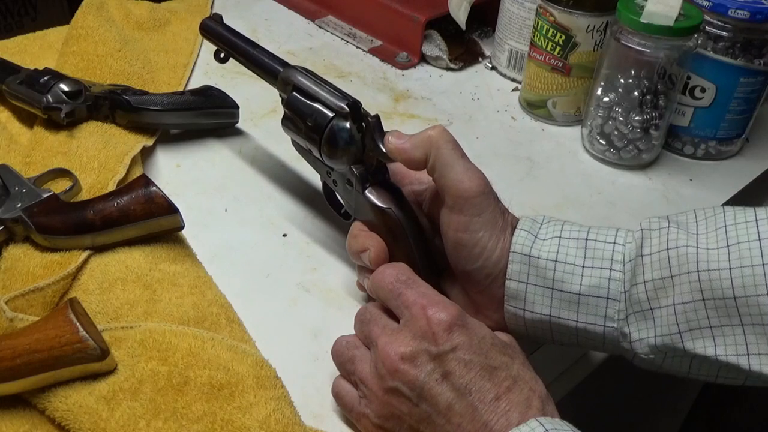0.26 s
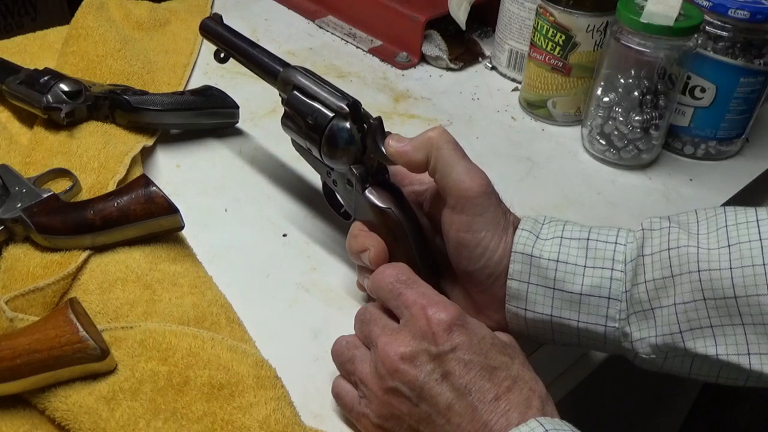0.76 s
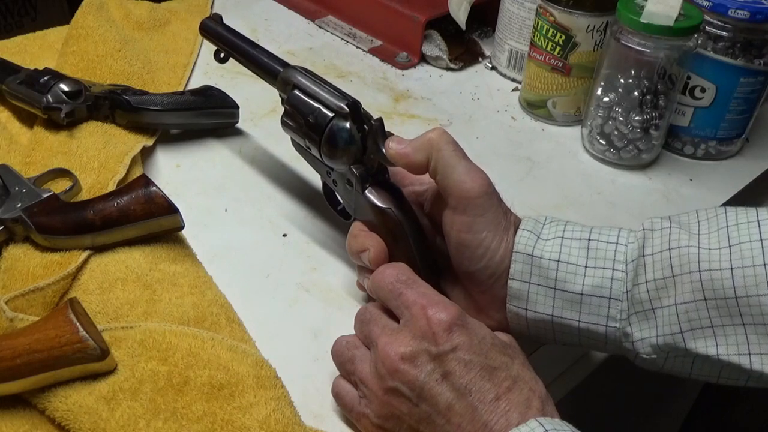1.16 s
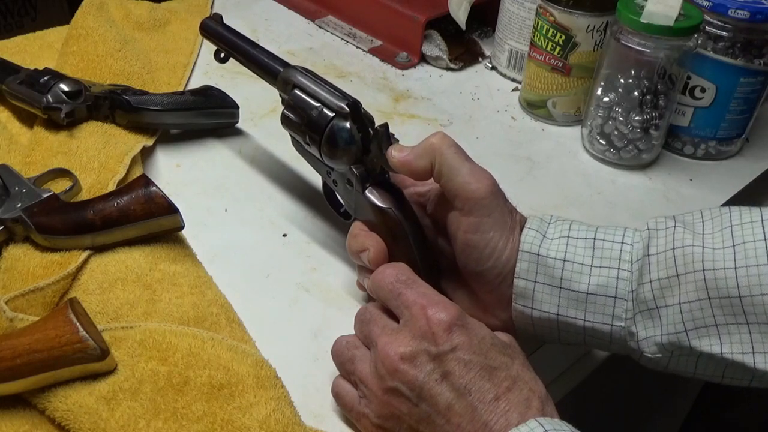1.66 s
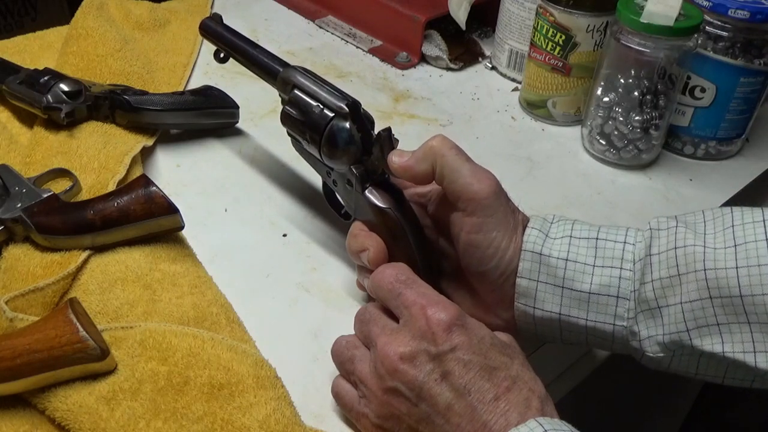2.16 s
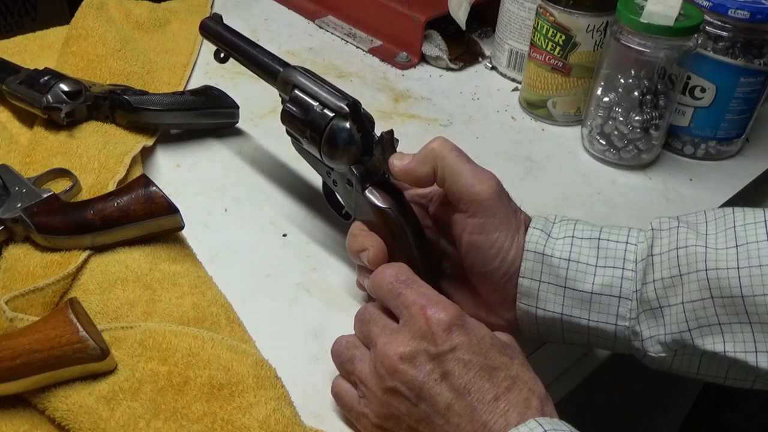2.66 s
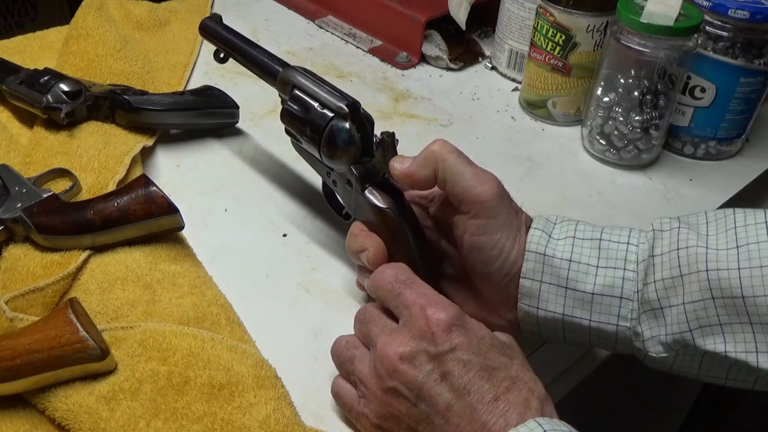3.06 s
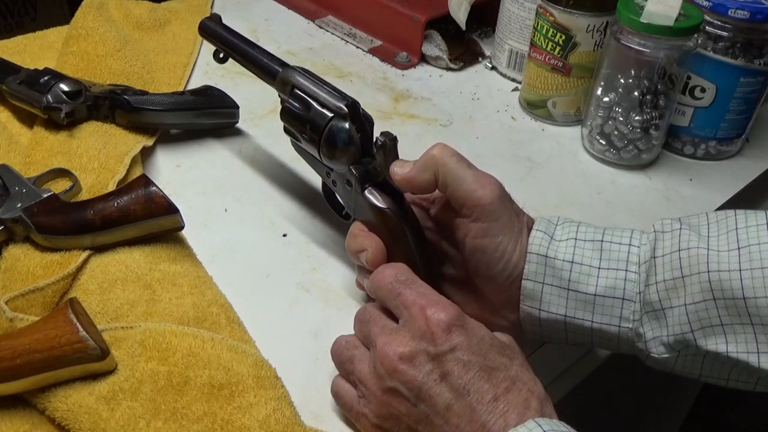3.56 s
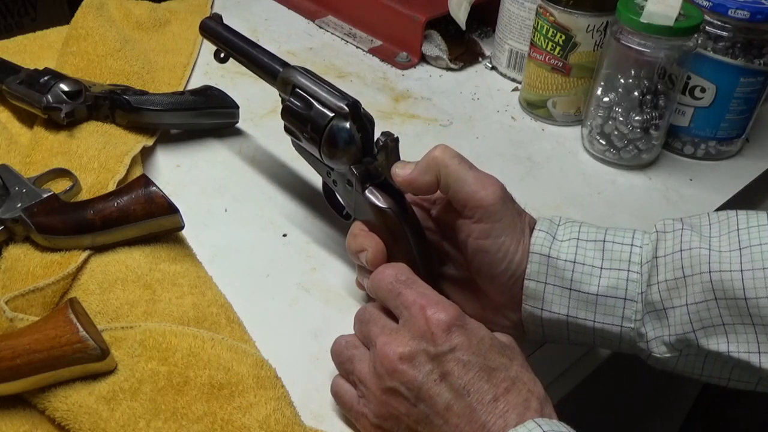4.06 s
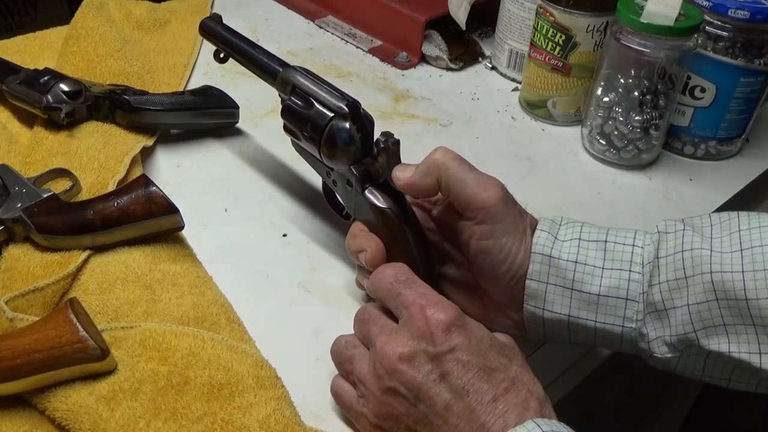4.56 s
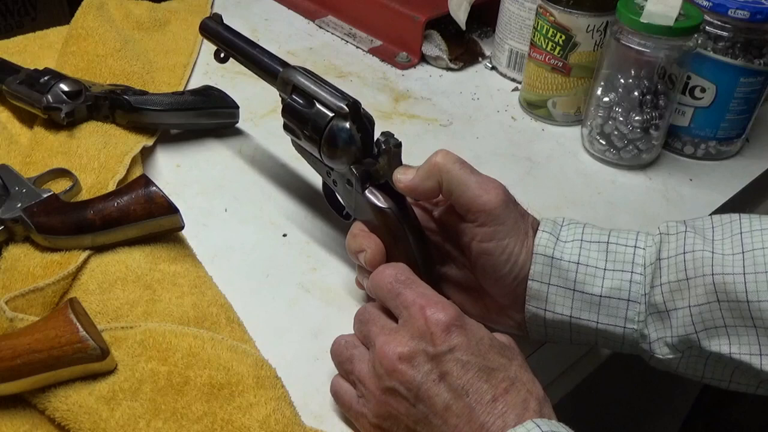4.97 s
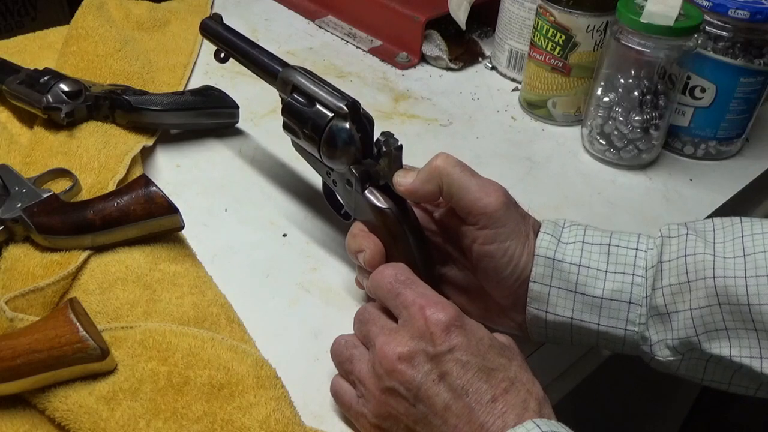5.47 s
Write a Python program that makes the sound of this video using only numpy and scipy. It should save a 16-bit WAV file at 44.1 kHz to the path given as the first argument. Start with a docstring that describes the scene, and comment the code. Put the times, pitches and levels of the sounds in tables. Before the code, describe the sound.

A revolver is handled close to the microphone in a small, quiet workshop, with faint, steady room air and hiss throughout. At about 0.3 seconds the thumb bumps the gun softly, with a fainter touch at 0.6. At 0.8 seconds the hammer drops into its first catch with a sharp metallic click that has a little hollow body from the frame. Between 2 and 3.1 seconds come a few very faint, dull bumps of the hand. At about 3.5 seconds the second catch gives the brightest, strongest click, with a tiny steel ring. After a pause of only room hiss, a third, slightly softer and thinner click sounds at about 5.4 seconds. Each click dies away almost at once, followed by a very short echo from the room.

```python
"""In a small, quiet workshop, a revolver hammer is thumbed slowly back over a bench.
The lockwork drops into three catches; each impact excites the normal modes of the steel and of the
hand-held frame for a few milliseconds. Before and between the catches the thumb bumps the gun softly.
The room answers with early echoes, a short diffuse tail and standing waves, over steady air and hiss."""
import sys
import numpy as np
from scipy import signal
from scipy.fft import rfft, irfft
from scipy.io import wavfile

SR = 44100
rng = np.random.default_rng(int(sys.argv[2]) if len(sys.argv) > 2 else 0)


def unload_wav(signal):
    """Save mono or channel-first audio to the path in sys.argv[1] as 16-bit WAV at rate SR, clipped to [-1, 1]."""
    wavfile.write(
        sys.argv[1],
        SR,
        np.round(np.clip(np.atleast_2d(signal).T, -1, 1) * 32767).astype(np.int16),
    )


N = 252296
RING_S = np.arange(SR // 2) / SR  # time axis of one impulse response
LEFT_RIGHT = np.array([[1], [-1]])  # sign of the side signal in each channel
# normal modes of the hand-held frame: (frequency [Hz], time to peak [s], level [dB])
FRAME_MODES = [(143.9, .0037, -38.8), (239.7, .0019, -30), (380.9, .0022, -17.5), (552, .0033, -29.5),
               (782, .0019, -35), (1075, .003, -38), (1223, .0029, -20), (1640, .0022, -33),
               (1920, .0016, -25)]


def undb(db):
    """Amplitude ratio of a level in decibels."""
    return 10 ** (np.asarray(db) / 20)


def along(hz, points, values):
    """Linear interpolation on a logarithmic frequency axis."""
    return np.interp(np.log(np.maximum(hz, 1)), np.log(points), values)


def colour(x, spectrum):
    """Spectral shaping by a table of (frequency [Hz], gain [dB])."""
    hz = np.fft.rfftfreq(x.shape[-1], 1 / SR)
    return irfft(rfft(x) * undb(along(hz, *np.transpose(spectrum))), x.shape[-1])


def roll_off(x, cutoff_hz, kind="low", order=1):
    """Butterworth filtering: 6 dB per octave for each order beyond the cut-off."""
    return signal.sosfilt(signal.butter(order, cutoff_hz, kind, fs=SR, output="sos"), x)


def add(track, time_s, sound):
    """Superposition: a sound joins the track at its onset time."""
    start = int(time_s * SR)
    part = sound[:N - start]
    track[start:start + len(part)] += part


def air(mid_rms_db=-59.72):
    """Stationary noise of room air and microphone hiss; the bass is nearly coherent in both channels."""
    # spectrum of air and hiss: (frequency [Hz], relative spectral density [dB])
    noise_spectrum = [(10, -15.5), (25, -7.5), (60, -4.5), (135, -1.5), (250, -2.5), (450, -6), (850, -8.5),
                      (1100, -7), (1220, -6), (1400, -10.5), (2000, -12), (4000, -15.5), (8500, -18.5),
                      (9600, -17), (11000, -22.5)]
    # stereo width: (frequency [Hz], side minus mid level [dB])
    side_spectrum = [(60, -11.5), (110, -12), (200, -7), (380, -2), (700, 1), (1290, -1), (2380, -1),
                     (4400, -4.5), (8120, -8), (15000, -7)]
    mid, side = (colour(rng.standard_normal(N), noise_spectrum) for _ in range(2))
    side = colour(side, side_spectrum)
    return (mid + LEFT_RIGHT * side) * undb(mid_rms_db) / mid.std()


def swell(peak_s, lag_s):
    """Transient envelope: vibration builds while the parts chatter and is damped as they seat."""
    age = np.maximum(RING_S - lag_s, 0) / peak_s
    return np.sqrt(age) * np.exp((1 - age ** 2) / 4)


def ring(modes, place, tilt_db, contact=np.ones_like, lag_cycles=0.54, node_db=-17):
    """Modal superposition: mode n spans n half-waves and is driven as much as it swings where struck."""
    middle_octave = np.log2(np.array(modes)[:, 0]).mean()
    sound = 0
    for n, (hz, peak_s, db) in enumerate(modes, 1):
        swing = np.hypot(np.sin(np.pi * n * place), undb(node_db))  # even a node takes a little
        force = undb(tilt_db * (np.log2(hz) - middle_octave)) * contact(hz)
        # neighbouring modes swing in opposite senses, and the low ones start last
        wave = (-1) ** (n - 1) * swell(peak_s, lag_cycles / hz) * np.sin(2 * np.pi * hz * RING_S)
        sound = sound + undb(db) * swing * force * wave
    return sound


def thumb(place=.345, tilt_db=-5.9):
    """Compliant contact: flesh pushes slowly, so frame modes above the cut-off are barely excited."""
    # bumps of thumb and hand: (time [s], level [dB], contact cut-off [Hz])
    bumps = [(0.3452, -21.2, 2400), (0.628, -29.7, 520), (2.044, -20.5, 115), (2.523, -30, 263),
             (2.71, -27.5, 169), (3.097, -32.5, 220)]
    track = np.zeros(N)
    for time_s, db, cutoff_hz in bumps:
        flesh = lambda hz: 1 / np.hypot(1, np.square(hz / cutoff_hz))
        add(track, time_s, undb(db) * ring(FRAME_MODES, place, tilt_db, flesh))
    return track


def diffuse_tail():
    """Reverberation: overlapping bands of noise decay exponentially, each at its own rate."""
    # scattered reflections: (frequency [Hz], level against the direct sound [dB], 60 dB decay time [s])
    reverb_bands = [(100.7, -17, .3), (349.5, -7.5, .3), (700, 6.5, .19), (1200, -11, 0.15),
                    (1679, 0, 0.155), (2490, -12.5, 0.1776), (3300, -11, .18), (4500, -10, 0.16),
                    (5856, -19, .17), (7760, -8, .16), (9805, -14, 0.19), (11000, -21.5, 0.17)]
    centres_hz, levels_db, t60s = np.transpose(reverb_bands)
    hz = np.fft.rfftfreq(len(RING_S), 1 / SR)
    noise = rfft(rng.standard_normal(len(RING_S)))
    tail = 0
    for band, db, t60 in zip(np.eye(len(centres_hz)), levels_db, t60s):
        band_noise = irfft(noise * along(hz, centres_hz, band), len(RING_S))
        fade = np.exp(-np.log(1000) * RING_S / t60)
        tail = tail + undb(db) * band_noise * fade / np.linalg.norm(fade)
    return tail


def workshop(sound, build_s=0.0013, side_db=-6, side_low_hz=550):
    """Convolution with a room impulse response: diffuse tail, early echoes and standing waves."""
    # nearest surfaces: (delay [s], gain [dB], left minus right level [dB], treble cut-off [Hz])
    echoes = [(.0021, -14.5, 6.5, 6000), (0.0137, -23, -6, 3980), (0.02, -14, 1, 900)]
    # standing waves: (frequency [Hz], 60 dB decay time [s], gain at resonance [dB])
    room_modes = [(138.2, .3, -2.5), (221.6, .28, 4), (252.2, 0.29, 8.5), (299.6, 0.32, 5), (352, 0.22, 7),
                  (442, 0.13, -11), (415, 0.06, -3), (571.5, 0.2246, 6), (616, 0.33, 3), (735, 0.15, 5),
                  (820, .18, 7.5)]
    side = roll_off(diffuse_tail(), side_low_hz, "high")  # long waves reach both sides alike
    build = 1 - np.exp(-RING_S / build_s)
    response = (diffuse_tail() + undb(side_db) * LEFT_RIGHT * side) * build
    for delay_s, db, pan_db, cutoff_hz in echoes:
        echo = signal.unit_impulse(len(RING_S), int(delay_s * SR))
        response += undb(db + LEFT_RIGHT * pan_db / 2) * roll_off(echo, cutoff_hz)
    for hz, t60, db in room_modes:
        fade = np.exp(-np.log(1000) * RING_S / t60) * build
        response += undb(db) * 2 * fade / fade.sum() * np.cos(2 * np.pi * hz * RING_S)
    return signal.fftconvolve(sound[None], response, axes=1)[:, :N]


def radiate(x, low_hz):
    """Radiation efficiency: small parts shed long waves poorly, a steep high-pass."""
    return roll_off(x, low_hz, "high", order=4)


def lockwork(tooth_width_hz=85, crack_s=0.0011, crack_low_hz=3000, ring_low_hz=105):
    """Impact excitation: each catch gives modal ringing, contact cracks and a snap sent to the walls."""
    # the three catches; place is the struck point along a part, tilt the brightness of the blow:
    # (time [s], frame place [0-1], frame level [dB], frame tilt [dB/octave],
    #  steel place [0-1], steel level [dB], steel tilt [dB/octave], tooth resonance [Hz], tooth lift [dB],
    #  crack level [dB], rebound delay [s], rebound gain [dB], snap level [dB], snap low cut-off [Hz])
    catches = [(0.8262, .258, .5, -1, .378, .7, 1, 5930, 12, -12, .0043, -1, 8.5, 1600),
               (3.4621, .12, -5, 5.4, .096, 4.2, .8, 4880, 9, -18, .0009, -8.5, 9.7, 700),
               (5.4220, .235, -14.6, -.6, .458, -2.7, -2.6, 5640, 7.5, -12.3, .0019, -3, 5.5, 1400)]
    # normal modes of the steel lockwork: (frequency [Hz], time to peak [s], level [dB])
    steel_modes = [(2307, .00069, -29.5), (2758, .0012, -26.5), (3190, .0014, -35), (3780, .00106, -25.5),
                   (4880, .00095, -29), (5640, .0016, -24), (5930, .0016, -24), (6260, .00037, -14.5),
                   (6663, .0017, -20.5), (7190, .0013, -19.5), (7560, .0017, -16), (7937, .0016, -21.5),
                   (9550, .00072, -10.5), (10680, .00077, -18.5), (13310, .0004, -7)]
    ringing, cracks, snaps = np.zeros((3, N))
    for (time_s, frame_place, frame_db, frame_tilt, steel_place, steel_db, steel_tilt,
         tooth_hz, tooth_db, crack_db, rebound_s, rebound_db, snap_db, snap_low_hz) in catches:
        # the resonance of each notch's tooth lifts the steel modes near it
        tooth = lambda hz: 1 + (undb(tooth_db) - 1) / (1 + np.square((hz - tooth_hz) / tooth_width_hz))
        add(ringing, time_s, undb(frame_db) * ring(FRAME_MODES, frame_place, frame_tilt))
        # the steel ring is added in opposite polarity, keeping the click full around 2-3 kHz
        add(ringing, time_s, -undb(steel_db) * ring(steel_modes, steel_place, steel_tilt, tooth))
        for delay_s, contact_db in [(0, 0), (rebound_s, rebound_db)]:
            grit = rng.standard_normal(len(RING_S)) * np.exp(-RING_S / crack_s)
            add(cracks, time_s + delay_s, undb(crack_db + contact_db) * grit)
        # summed over all directions, the blow has a flat spectrum above its cut-off
        add(snaps, time_s, undb(snap_db) * radiate(signal.unit_impulse(len(RING_S)), snap_low_hz))
    return radiate(ringing, ring_low_hz), radiate(cracks, crack_low_hz), snaps


def scene(beam_hz=5000):
    """Direct and reverberant fields add: gun and hand close by, the room behind them."""
    ringing, cracks, snaps = lockwork()
    body = ringing + thumb()
    # directivity: high modes radiate in narrow beams, so less of them reaches the walls
    spread = roll_off(body, beam_hz)
    # ring and snap leave in different directions and scatter along their own paths
    return body + cracks + workshop(spread) + workshop(snaps) + air()


def record(dry, band_hz=11050, top_hz=16300, leak_db=-36):
    """Band limiting: a little treble leaks past the band edge, and a second low-pass cuts it off."""
    band = signal.ellip(12, .2, 70, band_hz, fs=SR, output="sos")
    top = signal.ellip(8, .2, 70, top_hz, fs=SR, output="sos")
    return signal.sosfilt(top, signal.sosfilt(band, dry) + undb(leak_db) * dry)


dry = scene()
out = record(dry)
unload_wav(out)
```